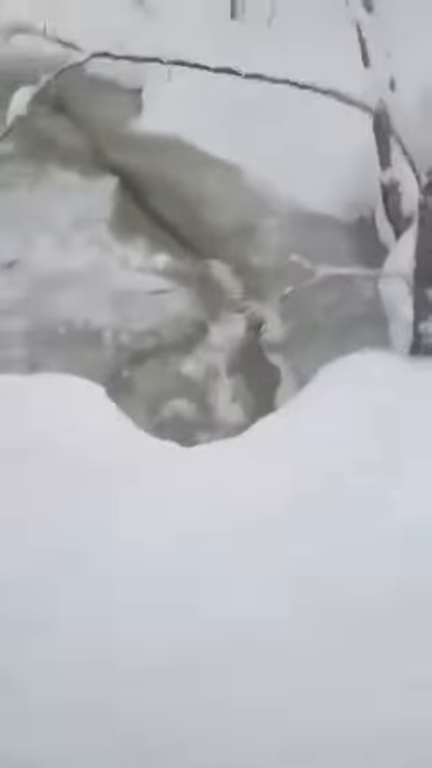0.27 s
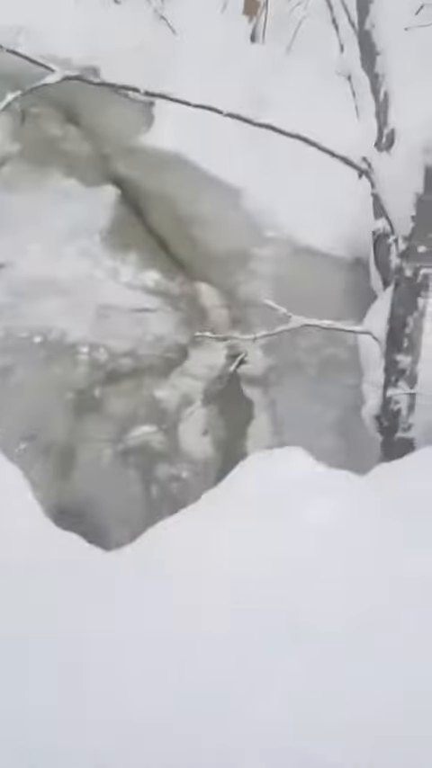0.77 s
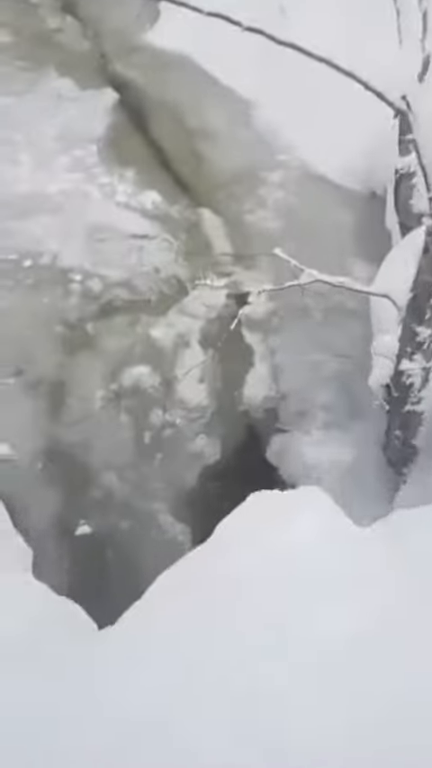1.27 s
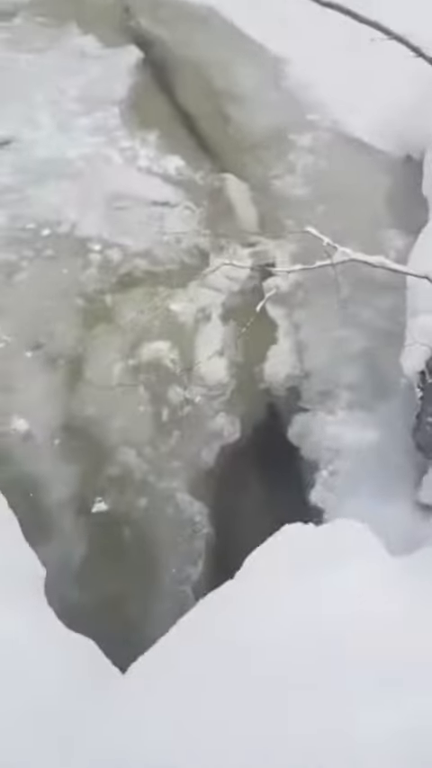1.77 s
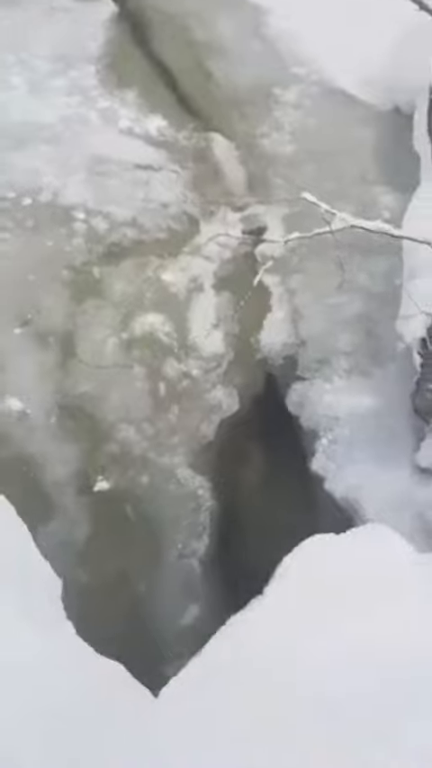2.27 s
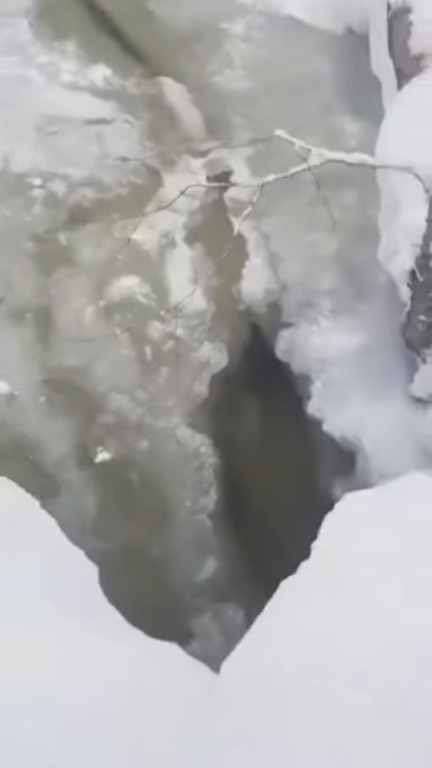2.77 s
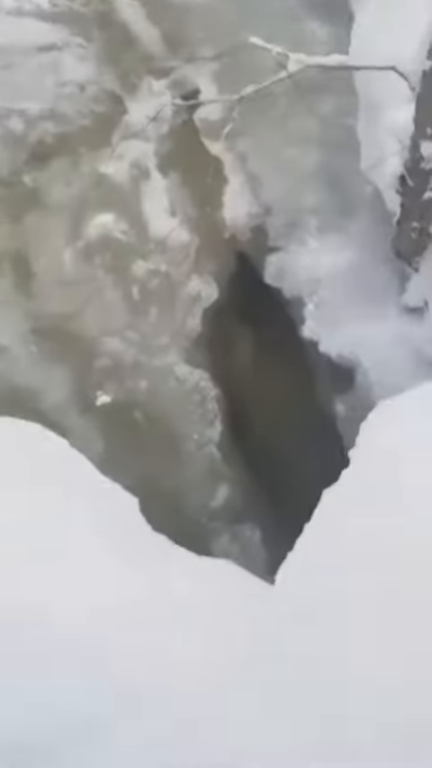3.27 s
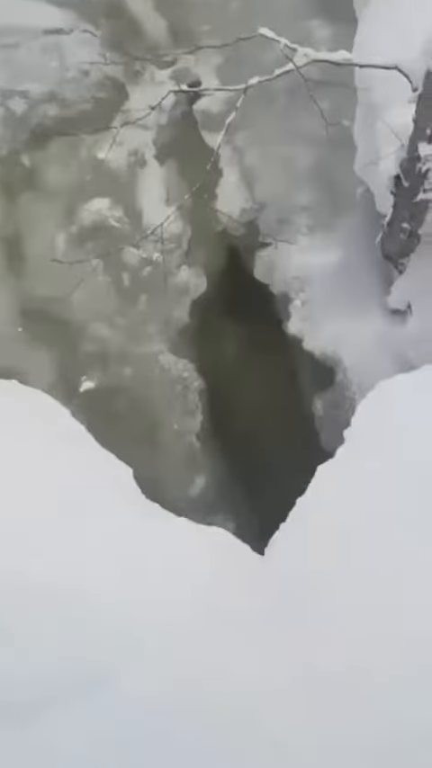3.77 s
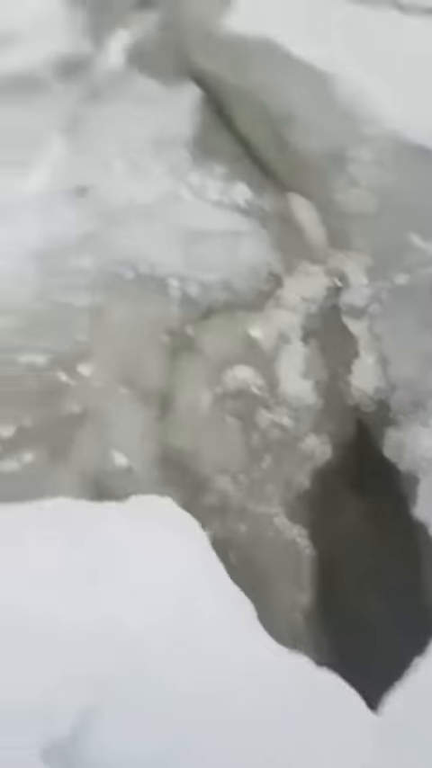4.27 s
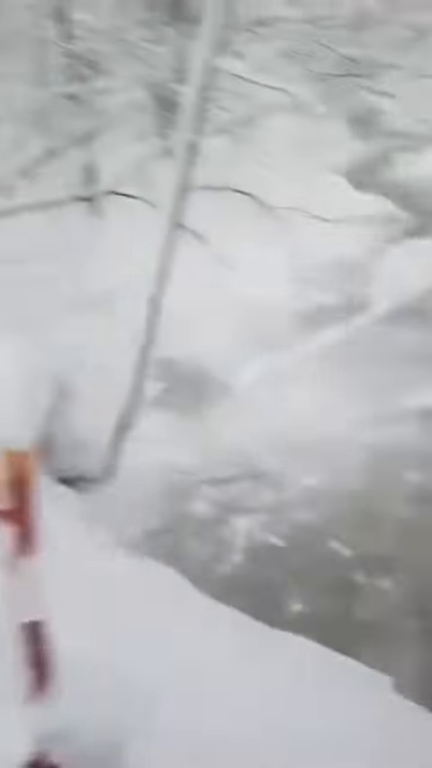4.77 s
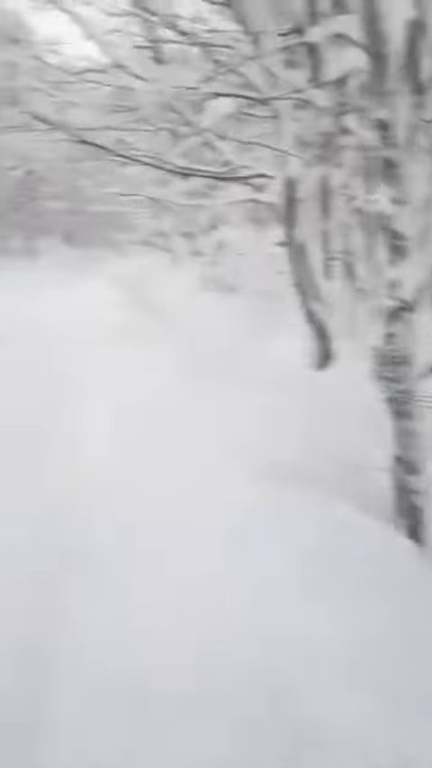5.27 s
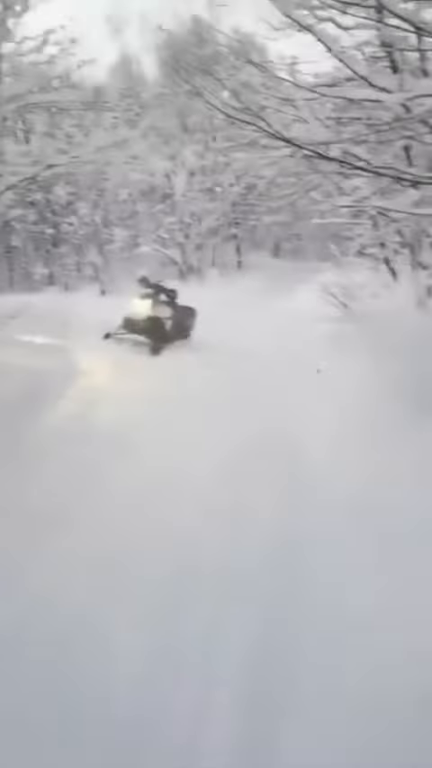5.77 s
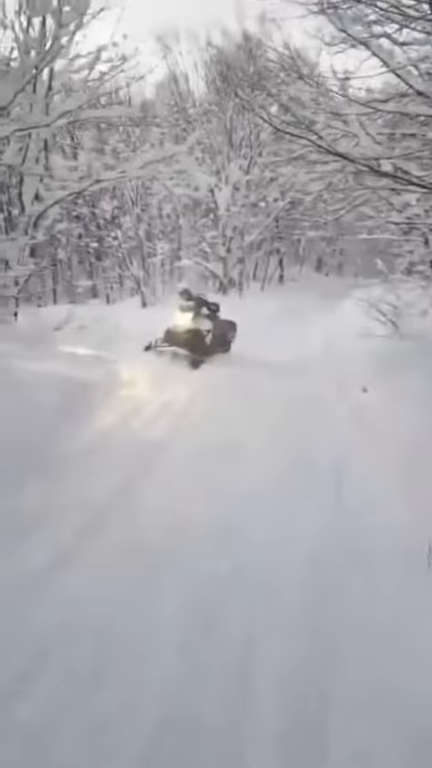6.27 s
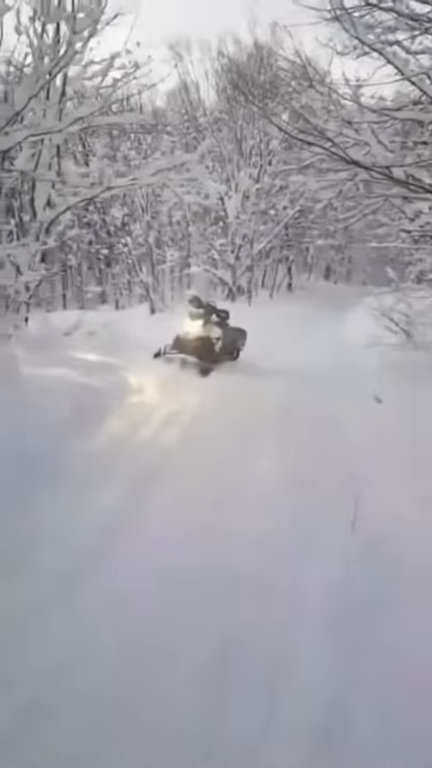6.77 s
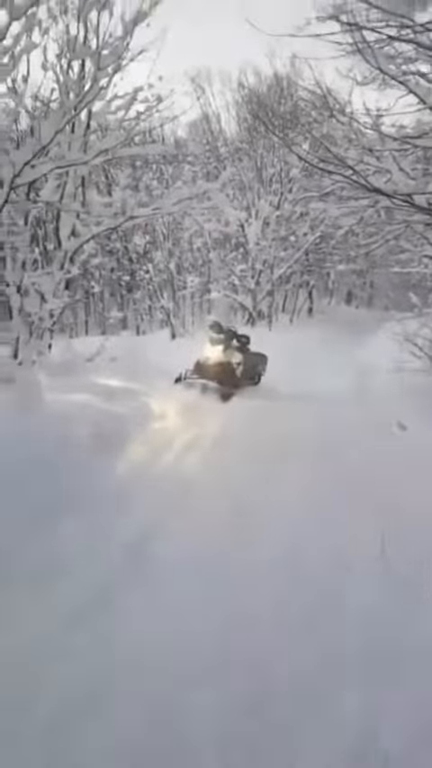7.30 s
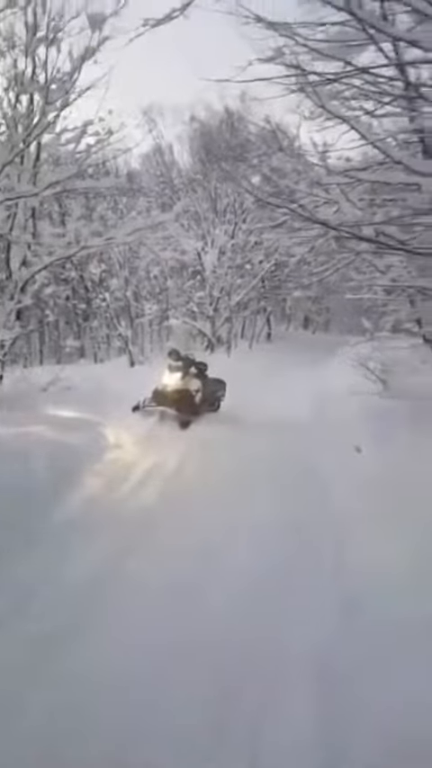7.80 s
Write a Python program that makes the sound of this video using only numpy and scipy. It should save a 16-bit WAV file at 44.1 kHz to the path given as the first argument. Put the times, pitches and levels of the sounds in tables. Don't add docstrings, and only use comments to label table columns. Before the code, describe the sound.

A snowmobile engine idles steadily at a distance in snowy woods while nearby boots crack through crust, later pressing softly into powder.

```python
import sys
import numpy as np
from scipy import signal
from scipy.fft import rfft, irfft
from scipy.io import wavfile

SR = 44100
rng = np.random.default_rng(int(sys.argv[2]) if len(sys.argv) > 2 else 0)


def rack_gain(trim_db):
    fader = np.asarray(trim_db, float)
    return 10 ** (fader / 20)


def wav_out(sig):
    wavfile.write(sys.argv[1], SR, np.round(np.clip(np.atleast_2d(sig).T, -1, 1) * 32767).astype(np.int16))


N = 354475
T = np.arange(N) / SR
TURN_S = (3.5, 5.1)
CRUST_ENDS_S = 3.5


def unit(x):
    return x / np.sqrt(np.mean(x ** 2))


def curve(table):
    s, value = np.transpose(table)
    return np.interp(T, s, value)


def turned(away, facing):
    return away + np.interp(T, TURN_S, (0, 1)) * (facing - away)


def colour(x, points, size=8192):
    hz, db = np.transpose(points)
    bin_hz = np.arange(size // 2 + 1) * SR / size
    gain_db = np.interp(np.log(bin_hz + 1), np.log(hz), db)
    cepstrum = irfft(np.log(rack_gain(gain_db)))
    cepstrum[1:size // 2] *= 2
    cepstrum[size // 2 + 1:] = 0
    response = irfft(np.exp(rfft(cepstrum)))[:size // 2]
    return signal.fftconvolve(x, response)[:len(x)]


def ring(x, hz, width):
    return signal.lfilter(*signal.iirpeak(hz, hz / width, fs=SR), x)


def walk(at):
    steps = int(at[-1]) + 2
    return np.interp(at, np.arange(steps), rng.standard_normal(int(T[-1] * 100))[:steps])


def grains(rate, scatter_db, tail_s):
    size_db = scatter_db * rng.exponential(size=N).clip(0, 3)
    hits = (rng.random(N) < rate / SR) * rack_gain(size_db)
    envelope = signal.lfilter([1], [1, -np.exp(-1 / (tail_s * SR))], hits)
    return unit(envelope * rng.standard_normal(N))


def strokes(rows, rise, fall):
    levels = []
    for s, span, first_db, last_db, *_ in rows:
        hold = np.interp(T, (s, s + span), (first_db, last_db))
        levels.append(hold - rise * (s - T).clip(0) - fall * (T - s - span).clip(0))
    return np.array(levels).clip(-120)


def rustle(size=800):
    # (time [s], level [dB])
    arm = [
        (0, -55),
        (2.05, -62),
        (3.44, -59),
        (3.48, -82),
        (4.05, -70),
        (4.3, -58.5),
        (4.9, -57),
        (6.0, -55),
        (8.04, -58.5),
    ]
    # (start [s], length [s], level at start [dB], level at end [dB])
    sweeps = [(0.0, 0.072, -43.5, -52.5), (.1, 0.19, -59, -45.5), (.27, 0.17, -44.5, -36.5),
              (.452, .025, -43, -48), (.624, 0.018, -42, -40), (.69, .07, -53, -59), (.95, 0.052, -47, -44),
              (1.02, 0.08, -47.5, -46), (1.12, 0.15, -43.5, -51), (1.29, 0.074, -57, -52.5),
              (1.42, 0.086, -51, -54.5), (1.58, 0.31, -49.5, -59)]
    # (time [s], peak [dB])
    ticks = [
        (0.4557, -17.5),
        (0.6963, -39),
        (0.7816, -30),
        (0.8964, -48),
        (1.3744, -51),
        (3.4326, -31),
        (4.803, -40),
        (5.885, -48),
    ]
    # (frequency [Hz], density [dB per Hz])
    cloth = [(1000, -39), (2500, 1), (5200, -4.5), (7000, -5), (8300, -2.5), (10000, -5.5), (14000, -3),
             (16000, -51)]
    air_db = -60
    arm_db = curve(arm) + 1 * walk(T * 9)
    sweep_db = strokes(sweeps, rise=1200, fall=898).max(axis=0)
    cloth_db = np.maximum(arm_db, sweep_db)
    fine = grains(rate=2600, scatter_db=3.2, tail_s=.002) * rack_gain(cloth_db + .8)
    fine = fine + rack_gain(air_db) * rng.standard_normal(N)
    for (s, db), noise in zip(ticks, rng.standard_normal((len(ticks), size))):
        i = int(s * SR)
        fine[i:i + size] += rack_gain(db - 10.5) * noise * np.exp(-T[:size] / 0.0021)
    return colour(fine, cloth) * rack_gain(3.0)


def whisks():
    # (start [s], length [s], level at start [dB], level at end [dB], lowest frequency [Hz])
    nylon = [
        (1.423, 0.069, -50, -58, 7500),
        (1.58, 0.17, -47.5, -55, 7500),
        (4.2, 0.077, -58, -57, 9500),
        (4.45, 0.17, -57, -55, 10500),
        (4.82, .22, -53, -57, 12300),
    ]
    hiss = rng.standard_normal(N)
    flutter_db = 1.9 * walk(T * 25)
    out = 0
    for row, stroke_db in zip(nylon, strokes(nylon, rise=330, fall=120)):
        highpass = signal.butter(3, row[-1], "high", fs=SR, output="sos")
        out = out + signal.sosfilt(highpass, hiss) * rack_gain(stroke_db + flutter_db)
    return out


def snow_colour(layers, bright_db, deep_db):
    # (frequency [Hz], density [dB per Hz])
    snow = [(35, -63), (80, -0.5), (950, -1), (1500, -5), (2500, -16.5), (4400, -27.5), (5000, -39),
            (9000, -78)]
    edges = ((310, "low"), ((400, 1800), "band"), (1800, "high"))
    bands = []
    for layer, (hz, kind) in zip(layers, edges):
        split = signal.butter(2, hz, kind, fs=SR, output="sos")
        bands.append(signal.sosfilt(split, colour(layer, snow, size=2048)))
    low, mid, top = bands
    return (rack_gain(deep_db + 8.5) * low + mid + rack_gain(bright_db + 13) * top) / np.std(mid)


def boots():
    # (start [s], length [s], crunch at start [dB], crunch at end [dB], low thud [dB])
    tread = [(0.0, 0.064, -47, -47, 1.5), (0.24, 0.043, -38, -41, -5), (0.295, .036, -36, -32, -8),
             (0.348, 0.042, -29, -25.5, -6), (0.398, 0.024, -31, -23.5, -7), (.452, .025, -34, -43, -6),
             (0.631, .024, -25, -36.5, -14), (0.952, 0.015, -27.5, -31, -8),
             (0.972, 0.037, -37, -39.5, 1.5), (1.027, 0.16, -40, -33.5, -1), (1.159, 0.1, -33, -36.5, -4),
             (1.241, 0.094, -35.5, -37, 0.5), (1.606, 0.15, -47.5, -49.5, 7), (5.3, .05, -42.5, -40, 4),
             (5.342, .115, -39, -38.5, 0.5), (6.05, 0.14, -46, -51, -9), (6.159, 0.15, -42, -38.5, -1.5),
             (6.37, .03, -42, -39, 0), (6.402, 0.052, -39.5, -38, 0), (6.51, 0.16, -37.5, -37.5, 4.5),
             (6.712, 0.014, -44, -42, -2), (6.771, 0.016, -44, -45, 7), (6.874, .02, -40, -42, 6)]
    steps = strokes(tread, rise=1502, fall=1105)
    load_db = steps.max(axis=0)
    deep_db = np.array(tread)[steps.argmax(axis=0), -1]
    bright_db = -14.5 + 0.25 * (load_db.clip(-60) + 43.5) - 1 * (T > CRUST_ENDS_S)
    crackle = grains(rate=900, scatter_db=3.0, tail_s=.0008) * rack_gain(2.5 * walk(T * 90))
    layers = []
    for crisp in (.3, .75, .3):
        scuff = grains(rate=3500, scatter_db=2.5, tail_s=.002) * rack_gain(1.8 * walk(T * 50))
        share = np.where(T < CRUST_ENDS_S, crisp, .12)
        layers.append(rack_gain(load_db) * (np.sqrt(share) * crackle + np.sqrt(1 - share) * scuff))
    scale = np.sqrt(np.mean(rack_gain(load_db) ** 2))
    return rack_gain(-0.5) * scale * snow_colour(layers, bright_db, deep_db)


def cracks(size=3000):
    # (time [s], peak [dB], ring [Hz], brightness [dB])
    crust_breaks = [(0.15, -20.5, 684, 3), (0.172, -29, 773, -8), (0.199, -22, 507, 0),
                    (0.227, -19.5, 875, -7), (0.249, -21, 519, -10), (0.266, -13.5, 1270, 3),
                    (0.279, -12.5, 630, -4), (0.297, -9, 754, 1), (0.312, -36, 748, -13),
                    (0.324, -15, 802, -2), (0.331, -23, 875, -4), (0.358, -13, 930, -12),
                    (0.385, -14, 856, -16), (0.406, -22, 598, -3), (0.417, -13.5, 640, -10),
                    (0.427, -12, 541, -15), (0.453, -15.5, 600, 6), (0.552, -13.5, 880, -5),
                    (0.627, -11, 675, -6), (0.658, -23, 982, 2), (0.803, -30, 557, -1),
                    (0.951, -13, 850, -7), (0.957, -21, 915, -14), (0.988, -25, 1110, -8),
                   (1.043, -19, 595, -10), (1.051, -14.5, 770, 4), (1.063, -20, 1150, 4),
                   (1.073, -16, 1120, -14), (1.082, -21, 791, -14), (1.091, -15, 1000, -14),
                   (1.109, -15, 940, -14), (1.117, -14, 1020, -14), (1.126, -19, 861, -17),
                   (1.141, -16, 1060, -11), (1.2, -27, 964, -14), (1.255, -32, 638, -14),
                   (1.312, -24, 904, -14), (1.388, -23.5, 754, -5), (1.443, -27, 934, -4),
                   (1.627, -26, 587, -10), (1.664, -27, 837, -14), (1.719, -26, 756, 7),
                   (3.041, -42, 778, -14)]
    # (time [s], peak [dB], ring [Hz], brightness [dB])
    lumps = [(5.304, -21, 557, -22), (5.351, -26, 501, -27), (5.375, -35, 580, -22), (5.404, -31, 576, -14),
             (6.367, -34, 509, -22), (6.503, -24, 600, -22), (6.713, -28, 686, -22), (6.777, -24, 660, -22),
             (6.88, -22.5, 580, -22), (6.891, -27, 614, -16), (7.847, -26, 1090, -22)]
    # (time [s], peak [dB], ring [Hz], brightness [dB])
    thuds = [
        (6.884, -18, 160, -36),
    ]
    rows = crust_breaks + lumps + thuds
    out, t = np.zeros(N + size), T[:size]
    for (s, db, hz, bright_db), noise in zip(rows, rng.standard_normal((len(rows), size))):
        t60_s, deep_db = (0.026, -20) if s < CRUST_ENDS_S else (0.031, -2)
        puff = noise * (1 - np.exp(-t / .001)) * rack_gain(-60 * t / t60_s)
        snap = 2.4 * np.sign(noise[0]) * np.exp(-t / 0.00019)
        puff = puff + snap
        slab = 1.6 * unit(ring(puff, hz, hz / 3))
        burst = snow_colour([puff] * 3, bright_db, deep_db) + slab
        i = int(s * SR)
        out[i:i + size] += burst * rack_gain(db - 3.5) / np.abs(burst).max()
    return out[:N]


def firing_rate():
    # (time [s], firing rate [Hz])
    idle = [(0.0, 39.47), (0.73, 39.59), (1.46, 40.02), (2.19, 40.8), (2.92, 40.82), (3.65, 38.94),
            (4.39, 41.7), (5.12, 39.3), (5.85, 41.0), (6.58, 40.09), (7.31, 40.1), (8.04, 39.33)]
    # (time [s], swing [Hz])
    stumbles = [(0.54, 1.45), (0.66, 2.42), (0.86, 1.81), (0.98, -1.13), (1.22, -2.07), (1.52, -3.07),
                (1.9, 0.99), (2.02, 1.36), (2.58, -1.12), (2.84, -1.95), (3.14, -2.1), (3.7, 0.89),
                (3.82, 1.91), (4.22, 0.78), (4.34, -1.27), (4.48, -1.78), (4.74, 1.32), (5.04, -2.39),
                (5.42, -1.85), (5.6, -2.38), (6.04, -2.25), (6.5, -0.97), (6.94, -1.95), (7.16, -1.91)]
    swing_s, recover_s = .1, .07
    rate = curve(idle)
    for s, hz in stumbles:
        rate = rate + hz * np.interp(T - s, (-swing_s, 0, recover_s), (0, 1, 0))
    return rate


def clatter(cycles, clatter_db):
    # (frequency [Hz], width [Hz], level turned away [dB], level facing [dB])
    panel_modes = [(709.7, 27, 4, 2), (994, 73, -3, -3.5), (1150, 155, 2.5, -2.5), (1277, 140, -1, -4.5),
                   (1674, 270, -10.5, -14.5)]
    # (frequency [Hz], density [dB per Hz])
    gas = [(28, -28), (140, -9), (460, -25), (900, -25), (2500, -37), (4000, -50.5), (6000, -52.5),
           (9000, -102)]
    gas_db = -43
    knocks = 0
    for place, db in ((.035, 0), (.45, -4)):  # (share of the cycle, level [dB])
        count = np.floor(cycles / 2 - place + .012 * walk(cycles))
        knocks = knocks + rack_gain(db) * np.diff(count, prepend=0).clip(0, 1)
    shake = unit(knocks * rack_gain(1.6 * walk(cycles))) + .55 * rng.standard_normal(N)
    panels = 0
    for hz, width, away_db, facing_db in panel_modes:
        panels = panels + rack_gain(turned(away_db, facing_db)) * ring(ring(shake, hz, width), hz, width)
    pulse = 1 + 0.061 * np.cos(2 * np.pi * cycles + 0.55)
    rush = pulse * rack_gain(.9 * walk(T * 14)) * rng.standard_normal(N)
    rush_db = gas_db + 0.4 * (clatter_db + 56)
    return rack_gain(clatter_db + 1.03) * unit(panels) + rack_gain(rush_db) * unit(colour(rush, gas))


def exhaust(cycles, third_db, fourth_db, high_db, tenth_db):
    # (multiple of firing rate [-], level [dB])
    orders = [(1, -13), (2, -21), (3, 1), (4, -3), (5, -11.5), (6, -21.5), (7, -19.5), (8, -22.5), (9, -30),
              (10, -26), (11, -53), (12, -42)]
    sway_db = {1: 1.3, 3: -0.05}
    strength_db = 0.19 * walk(cycles) + 0.17 * np.cos(np.pi * cycles)
    phase = 2 * np.pi * (cycles + .003 * walk(cycles))
    out, sway = 0, walk(T * 7)
    for k, db in orders:
        base_db = third_db + {4: fourth_db, 10: tenth_db}.get(k, db + (k > 4) * high_db)
        wander_db = walk(T * 9) * np.clip(.5 * (k - 4), .3, 3.) + sway_db.get(k, 0) * sway
        drift = walk(T * 12) * np.clip(.2 * (k - 4), .03, .45)
        lead = .3 * (min(k, 7) - 2.1) ** 2 - .25 + 1.6 * max(k - 7, 0)
        level_db = base_db + wander_db + strength_db * min(k / 3, 1)
        out = out + rack_gain(level_db) * np.cos(k * phase + lead + drift)
    return np.sqrt(2) * out


def sled():
    # (time [s], third order [dB])
    heard = [
        (0, -29),
        (1.3, -28.5),
        (1.6, -29.5),
        (4.3, -28.5),
        (5.0, -27),
        (6.3, -26.5),
        (8.04, -27),
    ]
    rate = firing_rate()
    cycles = np.cumsum(rate) / SR + 1.98
    fast = rate - 40
    third_db = curve(heard) + 0.4 * fast
    fourth_db = turned(-2.5, -1.16) + turned(-0.17, -1.34) * fast
    high_db = turned(0, 0.23) - 2.17 * fast
    tenth_db = turned(-26.5, -28.5) + 2.5 * fast
    tone = exhaust(cycles, third_db, fourth_db, high_db, tenth_db)
    return tone + clatter(cycles, turned(-52, -48))


def scene():
    return (sled() + boots() + cracks() + rustle() + whisks())[None]


def top_cut(x):
    return signal.sosfilt(signal.butter(12, 14630, fs=SR, output="sos"), x)


def record(dry):
    lowpass = signal.ellip(12, .3, 70, 13980, fs=SR, output="sos")
    return top_cut(signal.sosfilt(lowpass, dry))


dry = scene()
out = record(dry)
wav_out(out)
```